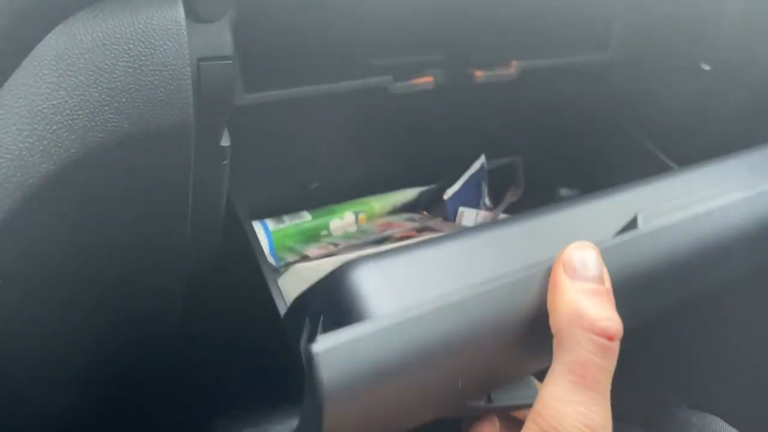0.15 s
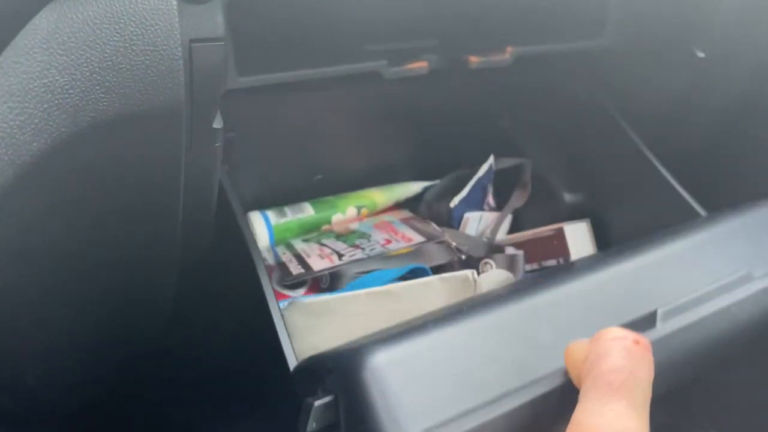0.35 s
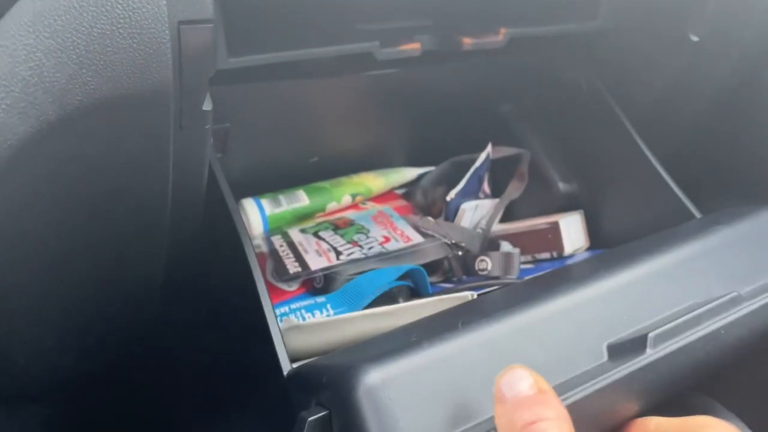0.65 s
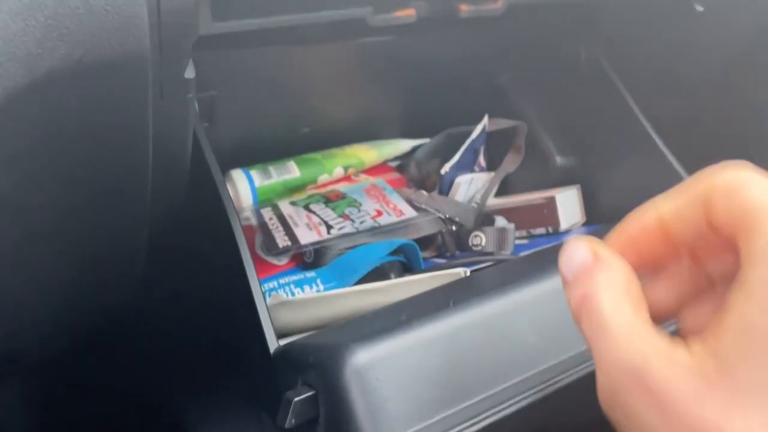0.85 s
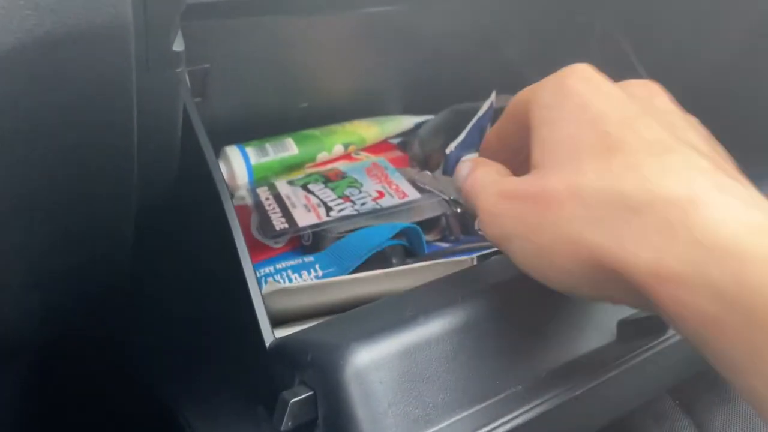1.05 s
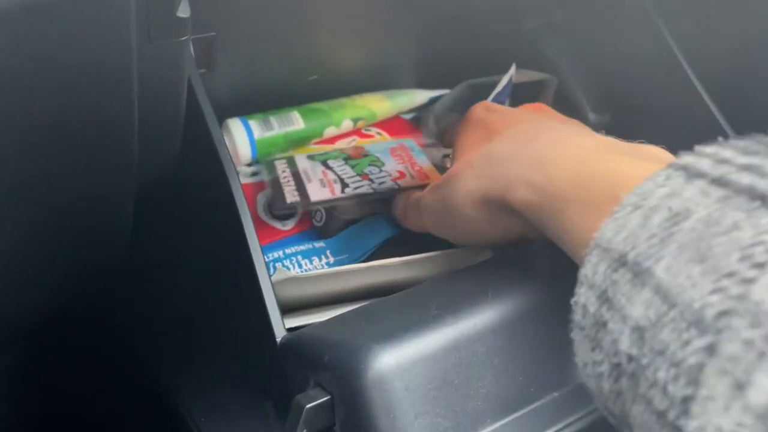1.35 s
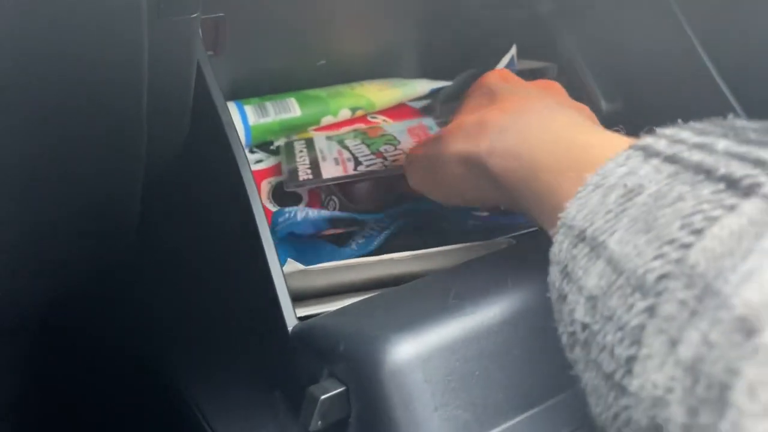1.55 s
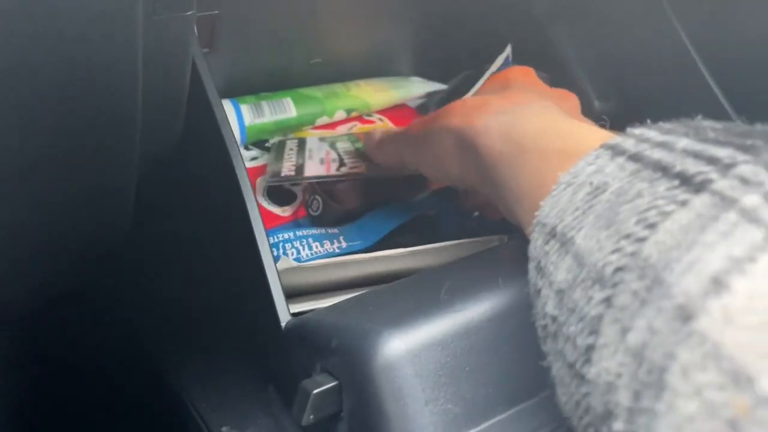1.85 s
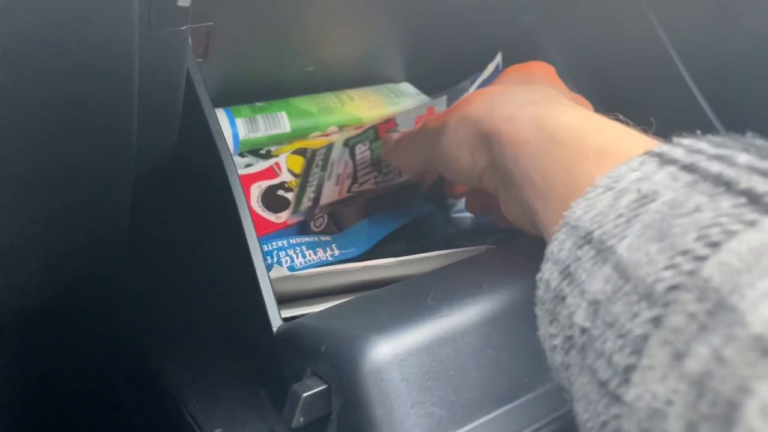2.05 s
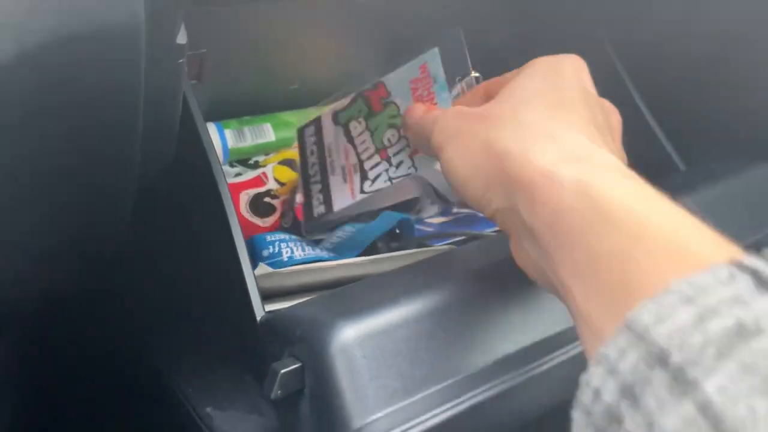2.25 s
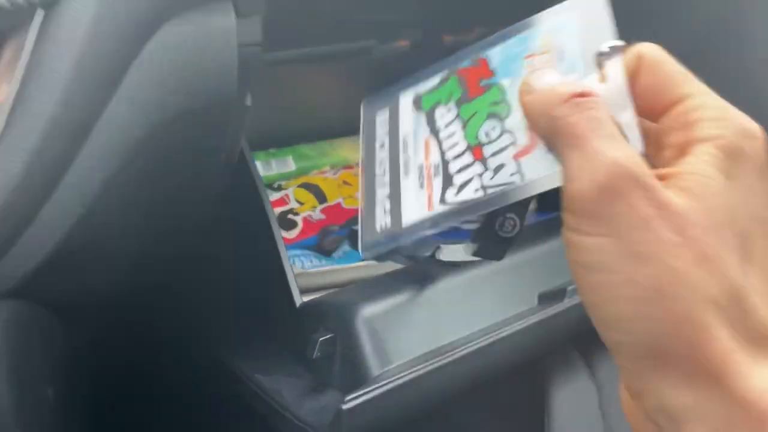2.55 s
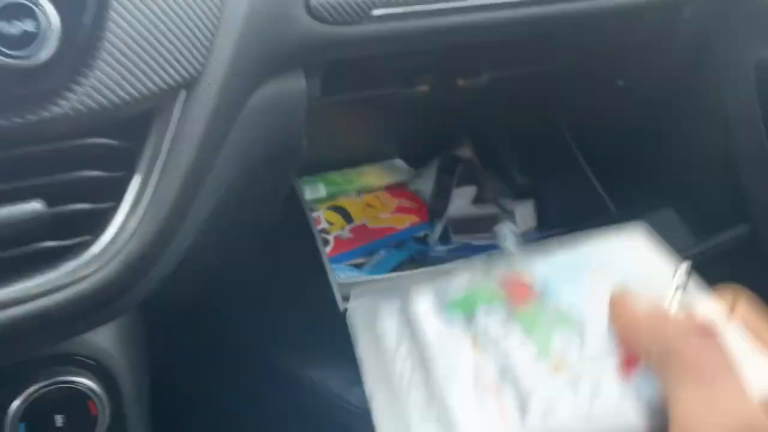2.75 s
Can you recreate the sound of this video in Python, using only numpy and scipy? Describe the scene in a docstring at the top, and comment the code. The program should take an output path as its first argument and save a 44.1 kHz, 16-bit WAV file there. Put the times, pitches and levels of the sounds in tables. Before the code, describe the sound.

A plastic car glove box drops open with a knock and thump, then a hand rummages inside

```python
"""Inside a parked car, light knocks and a thin tinkle lead into a plastic glove box swinging open.
It knocks against its stop, then settles with a thump: ringing modes, a noise crack and dashboard modes.
A hand rummages on in short resonant knocks and shifting rustle; near the end the metal clasp of a
laminated pass clicks and tinkles. A low swelling boom, a hum and soft air last throughout.
Two close microphone ports pick it all up, each with its own phase and level."""
import sys
import numpy as np
from scipy import signal
from scipy.fft import rfft, irfft, next_fast_len
from scipy.io import wavfile
from scipy.ndimage import uniform_filter1d, map_coordinates

SR = 44100
rng = np.random.default_rng(int(sys.argv[2]) if len(sys.argv) > 2 else 0)


def wav_record(signal):
    """Record a signal, one row per channel, as 16-bit PCM in the file named by sys.argv[1]."""
    frames = np.transpose(np.atleast_2d(signal))
    bounded = np.clip(frames, -1, 1)
    # unit amplitude maps onto the largest positive 16-bit level
    quanta = np.round(bounded * 32767).astype(np.int16)
    wavfile.write(sys.argv[1], SR, quanta)


N = 127890  # samples, 2.9 s


def amp(db):
    """Decibels to gain."""
    return 10 ** (np.asarray(db) / 20)


def unit(x):
    """Scaled to rms 1."""
    return x / np.sqrt(np.mean(x ** 2) + 1e-20)


def along(points, hz):
    """(Hz, value) points read on a log axis."""
    f, v = np.transpose(points)
    return np.interp(np.log(hz + 1), np.log(f + 1), v)


def curves(rows):
    """One value per sample for each column after the time."""
    s, *cols = np.transpose(rows)
    return [np.interp(np.arange(N) / SR, s, c) for c in cols]


def wobble(rate):
    """A smooth random curve, rate knots a second."""
    knots = rng.standard_normal(int(N * rate / SR) + 4)
    return map_coordinates(knots, [np.arange(N) * rate / SR])


def filtered(x, response):
    """x times a response of frequency."""
    n = x.shape[-1]
    m = next_fast_len(n + 8192)  # zero padding keeps the filter's tail from wrapping round
    return irfft(rfft(x, m) * response(np.fft.rfftfreq(m, 1 / SR)), m)[..., :n]


def noise(gain, size):
    """Coloured noise of rms 1."""
    return unit(filtered(rng.standard_normal(size), gain))


def shape(points):
    """The gain of (Hz, dB) points as a function of frequency."""
    return lambda hz: amp(along(points, hz))


def fade(t60, attack, delay=0):
    """Half a second of quick rise and exponential decay; all times in seconds."""
    t = np.maximum(np.arange(SR // 2) / SR - delay, 0)
    return np.exp(-np.log(1000) * t / t60) * (1 - np.exp(-t / attack))


def ring(modes, rise_cycles, gain=lambda hz: 1, lag_cycles=0):
    """Damped modes, struck a little differently each time; rise and lag in cycles make low ones later."""
    t = np.arange(SR // 2) / SR
    total = np.zeros(SR // 2)
    for hz, db, t60 in modes:
        level = gain(hz) * amp(db + rng.normal(0, 1))
        envelope = fade(t60, rise_cycles / hz, lag_cycles / hz)
        total += level * envelope * np.sin(2 * np.pi * (hz * t + rng.random()))
    return total


def add(track, s, sound):
    """Mix a sound into the track at s seconds."""
    part = track[round(s * SR):][:len(sound)]
    part += sound[:len(part)]


# Blows of the lid. Each row: start in seconds, level in dB, contact cut-off in Hz, dashboard thump in dB.
LID_BLOWS = [(0.3211, -26, 6000, -61), (0.3231, -13.5, 3970, -30), (0.4235, -22, 1000, -37),
             (0.434, -25.5, 500, -23)]
# Ringing modes of the plastic lid. Each row: frequency in Hz, relative level in dB, t60 in seconds.
LID_MODES = [(379.6, 0, 0.083), (497, 2, 0.048), (610, -2, 0.055), (736, -2, 0.042), (964, -9.5, 0.05),
             (1117, -8, 0.036), (1230, -12, 0.025), (1353, -7, 0.036), (1625, -7.5, 0.0324),
             (1910, -6, 0.026), (2006, -9.5, 0.048), (2230, -18, 0.03), (2575, -16, 0.045),
             (2672, -15.5, 0.059)]
# Colour of the crack before the contact dulls it. Each row: frequency in Hz, gain in dB.
CRACK_COLOUR = [(300, -30), (700, 5), (1900, 1.5), (3200, -7.5), (5500, -12), (9000, -16.5), (15000, -21)]
# Ringing modes of the dashboard. Each row: frequency in Hz, relative level in dB, t60 in seconds.
DASH_MODES = [(67.3, -7, 1), (84.1, -8, 0.5), (115.8, 3.5, 0.14), (181.7, -3.5, 0.13), (210.5, -18, 0.43),
              (243, 0.5, 0.054), (340.5, 1.5, 0.1)]
CRACK_DB, CRACK_T60_S = -5.5, 0.037
LID_RISE_CYCLES, LID_LAG_CYCLES, DASH_RISE_CYCLES = 1.3, 1.15, 0.44


def lid():
    """Each blow cracks and rings the plastic bin and shakes the dashboard; soft contacts are duller."""
    out = np.zeros(N)
    for s, db, soft_hz, thump_db in LID_BLOWS:
        contact = lambda hz: 1 / np.sqrt(1 + (hz / soft_hz) ** 2)
        crack = filtered(noise(shape(CRACK_COLOUR), SR // 2), contact)
        crack *= fade(CRACK_T60_S, attack=0.00042)
        plastic = ring(LID_MODES, LID_RISE_CYCLES, contact, LID_LAG_CYCLES)
        thump = ring(DASH_MODES, DASH_RISE_CYCLES)
        add(out, s, amp(db) * (plastic + amp(CRACK_DB) * crack) + amp(thump_db) * thump)
    return out


# Contents knocking about. Each row: start in seconds, level in dB, centre in Hz, t60 in seconds,
# width in octaves.
KNOCKS = [(0.04, -48.5, 315, 0.08, 0.14), (0.157, -43.5, 1180, 0.14, 0.23), (0.165, -43, 1150, 0.047, 0.33),
          (0.286, -46, 1740, 0.095, 0.57), (0.472, -44.5, 950, 0.056, 0.64),
          (0.499, -51.5, 900, 0.035, 0.62), (0.6, -35.5, 612, 0.038, 0.42), (0.604, -41, 316, 0.11, 0.33),
          (0.719, -43, 2300, 0.037, 0.49), (0.955, -39, 235, 0.083, 0.37),
          (1.160, -34.5, 1420, 0.026, 0.38), (1.162, -43.5, 395, .05, 0.24),
          (1.179, -47.5, 860, 0.057, 0.71), (1.319, -47, 1220, 0.024, 0.23), (1.343, -42, 612, 0.052, .65),
          (1.351, -44.5, 900, 0.047, 1.9), (1.377, -39.5, 900, 0.032, 0.17),
          (1.381, -32.5, 420, 0.033, 0.33), (1.389, -37, 232, 0.1, 0.31), (1.41, -49, 850, .025, 0.23),
          (1.438, -45.5, 990, 0.029, 0.38), (1.536, -51, 1240, 0.028, .6), (1.573, -54, 1750, 0.026, 0.13),
          (1.671, -45.5, 960, 0.033, 0.43), (1.772, -52, 890, 0.027, 0.24),
          (1.821, -49.5, 826, 0.045, 0.23), (1.876, -54.5, 1300, 0.056, 1.2),
          (1.889, -47, 770, 0.046, 0.27), (1.966, -45, 990, 0.04, 0.85), (1.98, -45, 759, 0.07, .25),
          (2.078, -45, 1200, 0.046, 0.83), (2.3765, -35, 3212, 0.019, 0.44),
          (2.378, -44.5, 791, 0.08, 0.85), (2.397, -38, 614, 0.039, 0.51), (2.450, -49, 800, 0.027, .9),
          (2.577, -45, 2860, 0.024, 0.34)]
KNOCK_EDGE_DB, KNOCK_ATTACK_S = -19, 0.00064  # level of the broad skirt round the resonance, rise time


def contents():
    """Packets and cards bump: each a short resonance, narrow for a hollow knock and wide for a tick."""
    out = np.zeros(N)
    for s, db, centre_hz, t60, octaves in KNOCKS:
        def body(hz):
            peak = np.exp(-.5 * (np.log2((hz + 1) / centre_hz) / octaves) ** 2)
            skirt = 1 / (1 + (hz / (2 * centre_hz)) ** 2)
            return peak + amp(KNOCK_EDGE_DB) * skirt
        envelope = fade(t60, KNOCK_ATTACK_S)
        knock = unit(noise(body, SR // 2) * envelope)
        # give every knock the energy of its envelope, however the noise fell
        add(out, s, amp(db) * knock * np.sqrt(np.mean(envelope ** 2)))
    return out


# Clicks of clasp and card. Each row: start in seconds, level in dB, t60 of the snap in seconds,
# metal ring in dB relative to the click level.
CLICKS = [(0.149, -52.5, .05, -18), (0.4245, -45.5, 0.028, -31), (0.4335, -41, 0.056, -29),
          (1.158, -53.5, 0.031, -4.5), (1.343, -48.5, .06, -27), (1.485, -45, 0.014, -30),
          (1.877, -54, 0.079, -25), (1.964, -49.5, 0.038, -32), (2.3762, -39.5, 0.028, -17),
          (2.394, -30.5, 0.03, -4), (2.413, -42.5, 0.03, 2), (2.457, -49.5, 0.027, -15),
          (2.576, -48.5, 0.04, -30), (2.672, -46, 0.03, -19), (2.8925, -31, 0.02, -6)]
# Colour of the snap. Each row: frequency in Hz, gain in dB.
CLICK_COLOUR = [(500, -1.5), (1500, -1), (2700, 1), (4500, -3), (6200, 2.5), (8500, -0.5), (11500, -7.5),
                (15500, -8)]
# Ringing modes of the metal clasp. Each row: frequency in Hz, relative level in dB, t60 in seconds.
CLASP_MODES = [(5950, -3, .035), (6090, 0, .045), (6900, -8, .025), (7450, -3, .03), (8600, -5, .035),
               (11600, -9, .03)]
# Small metal links tinkling. Each row: start in seconds, level in dB.
TINKLES = [(0.145, -52.5), (0.29, -62.5), (1.276, -50.5), (1.345, -53.5), (1.819, -64.5), (2.575, -49.5),
           (2.595, -53), (2.607, -60), (2.67, -61.5)]
# Ringing modes of the links. Each row: frequency in Hz, relative level in dB, t60 in seconds.
LINK_MODES = [(9100, -9, .05), (11500, -4, .06), (12100, -1, .07), (13100, -5, .05), (14300, -4, .05),
              (15100, -1, .06), (15650, 1, .06)]
METAL_RISE_CYCLES = 2.7


def clasp():
    """Sharp noise snaps of card and clasp with metal modes, and the thin tinkle of small links."""
    out = np.zeros(N)
    for s, db, t60, ring_db in CLICKS:
        snap = noise(shape(CLICK_COLOUR), SR // 2) * fade(t60, attack=0.0001)
        metal = ring(CLASP_MODES, METAL_RISE_CYCLES)
        add(out, s, amp(db) * (snap + amp(ring_db) * metal))
    for s, db in TINKLES:
        jitter = noise(lambda hz: hz < 150, SR // 2)  # slow noise makes the ring uneven
        add(out, s, amp(db) * ring(LINK_MODES, METAL_RISE_CYCLES) * jitter)
    return out


# Sliding of sleeve, hand and contents. Each row: time in seconds, level in dB.
RUB = [(0, -75), (0.05, -67), (0.22, -61.5), (0.31, -52), (0.37, -64), (0.41, -47), (0.49, -52),
       (0.6, -63.5), (0.66, -53.5), (0.73, -55), (0.755, -70), (0.8, -66), (0.85, -88.5), (0.93, -76.5),
       (1.0, -71), (1.14, -69), (1.19, -57), (1.27, -50), (1.32, -56), (1.43, -54.5), (1.52, -59),
       (1.6, -59.5), (1.74, -68.5), (1.86, -64.5), (1.9, -59.5), (2.02, -61), (2.2, -53.5), (2.3, -61),
       (2.37, -59), (2.42, -58.5), (2.52, -61), (2.6, -55), (2.65, -58.5), (2.74, -49), (2.8, -61),
       (2.9, -59)]
# Colour of the sliding. Each row: frequency in Hz, gain in dB.
RUSTLE_COLOUR = [(150, 13.5), (400, 1.5), (900, 5), (1600, -1), (2800, 0.5), (4000, -3), (7000, -5.5),
                 (10000, -9), (13000, -9), (15500, -18)]
CATCHES_PER_S, CATCH_SIZE, CATCH_T60_S = 97, 1.2, 0.021
RUB_FLUTTER_DB, RUB_PATCHY_DB = 1.3, 2.5  # depth of level flutter, of shifting colour


def rustle():
    """Sliding cloth and paper: a hiss whose colour keeps shifting, with tiny catches in it."""
    level_db, = curves(RUB)
    strikes = (rng.random(N) < CATCHES_PER_S / SR) * rng.random(N)
    catches = signal.fftconvolve(strikes, fade(CATCH_T60_S, attack=0.00027))[:N]
    z = signal.stft(rng.standard_normal(N) * (1 + CATCH_SIZE * catches), nperseg=512)[2]
    # random gains smoothed over frequency, then over time
    patches = uniform_filter1d(rng.standard_normal(z.shape), size=5, axis=0)
    patches = uniform_filter1d(patches, size=9, axis=1)
    friction = signal.istft(z * amp(RUB_PATCHY_DB * unit(patches)), nperseg=512)[1][:N]
    level = amp(level_db + RUB_FLUTTER_DB * wobble(60))
    return level * unit(filtered(friction, shape(RUSTLE_COLOUR)))


# Dull shifting of lid and contents under the hand. Each row: time in seconds, level in dB.
SHIFT = [(0, -58.5), (0.25, -52.5), (0.48, -54.5), (0.58, -59), (0.72, -53), (0.88, -72), (1.0, -58),
         (1.47, -52), (1.54, -62.5), (1.75, -63.5), (1.98, -55), (2.33, -63.5), (2.43, -51), (2.52, -66),
         (2.8, -70)]
# Colour of the shifting. Each row: frequency in Hz, gain in dB.
SHIFT_COLOUR = [(100, 2.5), (210, 4.5), (450, 0), (800, -11.5), (1700, -15.5), (4000, -34)]


def shifting():
    """The dull, uneven sound of things being pushed about in the bin: low noise of wavering level."""
    level_db, = curves(SHIFT)
    return amp(level_db + 2.2 * wobble(40.3)) * noise(shape(SHIFT_COLOUR), N)


# Cabin rumble. Each row: time in seconds, level in dB.
RUMBLE = [(0, -58), (0.06, -37), (0.12, -48.5), (0.28, -31.5), (0.38, -38.5), (0.46, -36), (0.52, -29.5),
          (0.58, -45), (0.72, -36.5), (0.78, -51.5), (0.95, -38), (1.02, -29.5), (1.14, -45), (1.2, -35.5),
          (1.26, -52), (1.47, -33), (1.55, -49), (1.72, -42), (1.78, -29.5), (1.87, -33.5), (1.94, -44),
          (2.25, -37.5), (2.34, -53.5), (2.48, -41), (2.53, -31), (2.65, -35.5), (2.82, -65), (2.9, -38.5)]
# Hum. Each row: time in seconds, pitch in Hz, fundamental in dB, octave in dB.
HUM = [(0, 118.9, -47.5, -60), (0.4, 117.3, -47.5, -49.5), (0.9, 117.7, -41.5, -69.5),
       (1.15, 116.9, -51.5, -65.5), (1.7, 118.9, -60, -61), (2.1, 123.9, -47.5, -60),
       (2.6, 124.5, -59.5, -59.5), (2.9, 121.1, -63, -55)]
# Colour of the bed of air. Each row: frequency in Hz, gain in dB.
AIR_COLOUR = [(20, -25.5), (31, -3.5), (42, 10), (80, 4), (140, -12.5), (210, -6.5), (320, -20), (700, -35),
              (1500, -41), (3000, -48), (7000, -51), (15000, -62)]
BOOM_HZ, BOOM_WANDER_HZ, AIR_DB = 53.96, 4.27, -45.5


def drone():
    """A swelling low boom of the cabin with wandering pitch, a hum with its octave and a bed of air."""
    boom_db, = curves(RUMBLE)
    pitch_hz, first_db, octave_db = curves(HUM)
    boom_turn = 2 * np.pi * np.cumsum(BOOM_HZ + BOOM_WANDER_HZ * wobble(17)) / SR
    boom = amp(boom_db) * np.sin(boom_turn)
    turn = 2 * np.pi * np.cumsum(pitch_hz) / SR
    hum = amp(first_db + 1.5 * wobble(9.04)) * np.sin(turn)
    hum += amp(octave_db + 0.7 * wobble(8.8)) * np.sin(2 * turn)
    # root two makes the dB of the tones rms levels
    return np.sqrt(2) * (boom + hum) + amp(AIR_DB) * noise(shape(AIR_COLOUR), N)


# Decay of the car's interior. Each row: frequency in Hz, t60 in seconds.
CABIN_DECAY = [(100, 0.43), (600, 0.06), (3000, 0.13), (12000, 0.071)]


def cabin(x):
    """The short, padded echo of the car's interior: noise that dies at its own rate in each band."""
    hz, t, z = signal.stft(rng.standard_normal(SR // 4), SR, nperseg=256)
    decay = np.exp(-np.log(1000) * t / along(CABIN_DECAY, hz)[:, None])
    tail = signal.istft(z * decay, SR, nperseg=256)[1]
    return signal.fftconvolve(x, tail / np.linalg.norm(tail))[:N]


CABIN_DB, UNLIKE_DB, RUB_WIDE_DB = -15, -13, -14  # echo in both ports, opposed echo, opposed rubbing


def scene():
    """Near sounds over the drone; echo and rubbing differ a little between the ports."""
    near = lid() + contents() + clasp() + rustle() + shifting()
    middle = near + amp(CABIN_DB) * cabin(near) + drone()
    side = amp(UNLIKE_DB) * cabin(near) + amp(RUB_WIDE_DB) * (rustle() + shifting())
    return np.array([middle + side, middle - side])


# Phase between the ports. Each row: frequency in Hz, lead of the left in radians.
PORT_PHASE = [(20, 0), (200, -.15), (800, -.75), (1300, -1.2), (1500, -1.1), (1700, .6), (1900, 1.6),
              (2250, .3), (3000, -.85), (4200, -.35), (5800, -.9), (6700, -2.2), (7400, -3.1), (8600, -3.1),
              (10300, -.3), (12000, .1), (13000, 1.3), (14000, 3)]
# Level between the ports. Each row: frequency in Hz, left minus right in dB.
PORT_TILT = [(60, .3), (150, -.5), (380, -5), (850, -6.5), (1900, -1), (2500, -3), (5000, -4.5),
             (7200, -.2)]
TOP_HZ = 15850  # band limit


def record(dry):
    """The port pair shifts phase and level between the channels; nothing passes above the band limit."""
    def ports(hz):
        # each port takes half of the difference, in opposite directions
        half = amp(along(PORT_TILT, hz) / 2) * np.exp(.5j * along(PORT_PHASE, hz))
        return np.array([half, 1 / half]) * (hz < TOP_HZ)
    return filtered(dry, ports)


dry = scene()
out = record(dry)
wav_record(out)
```